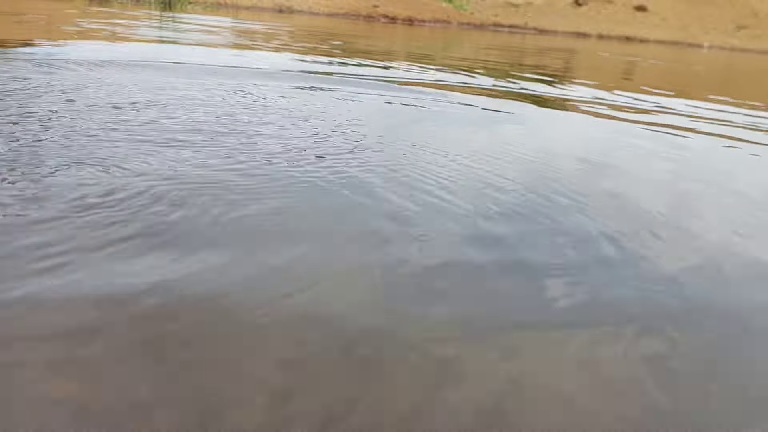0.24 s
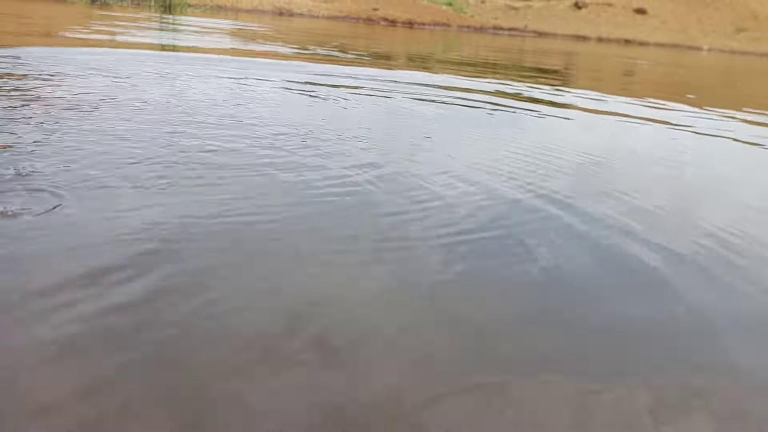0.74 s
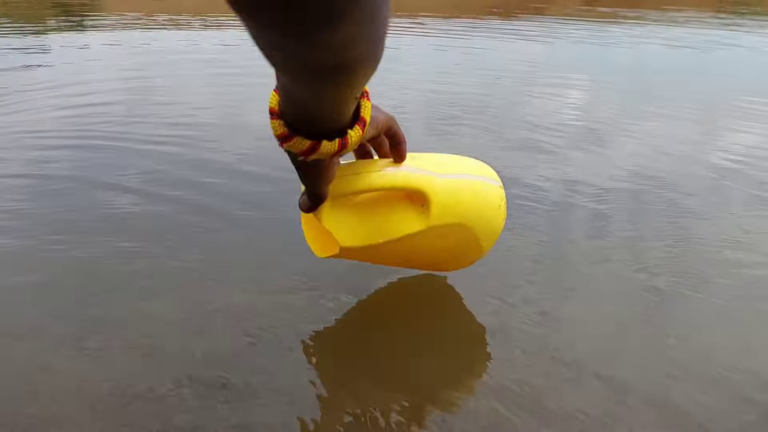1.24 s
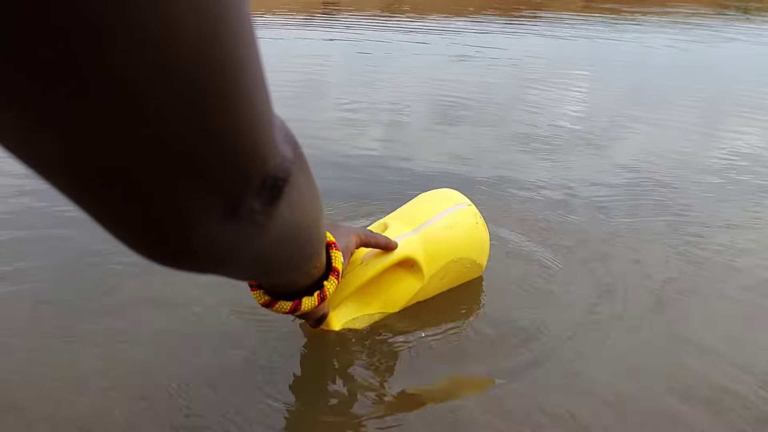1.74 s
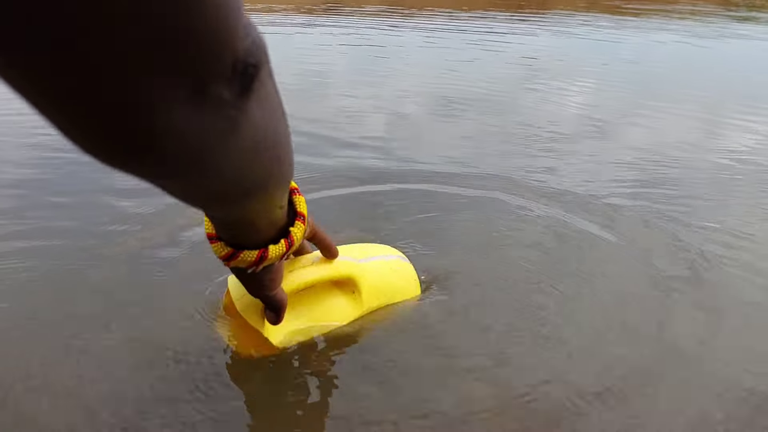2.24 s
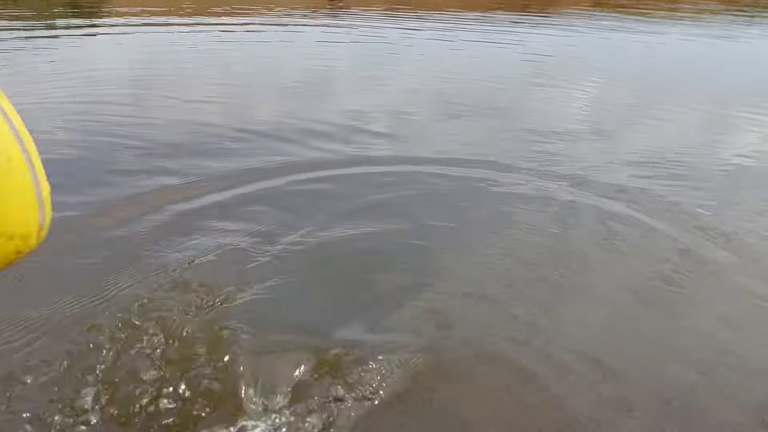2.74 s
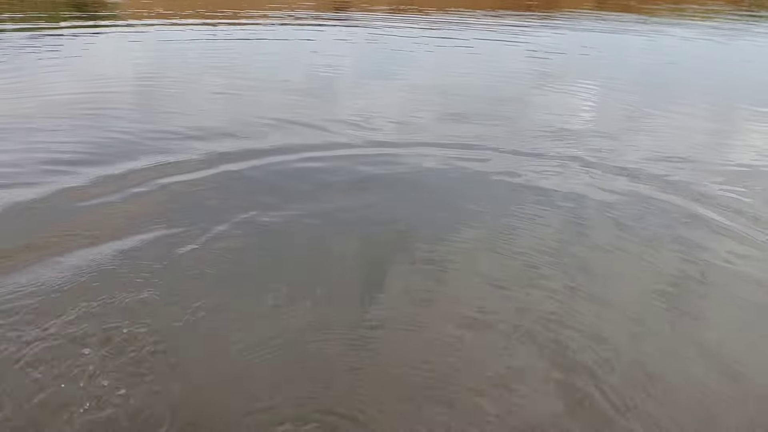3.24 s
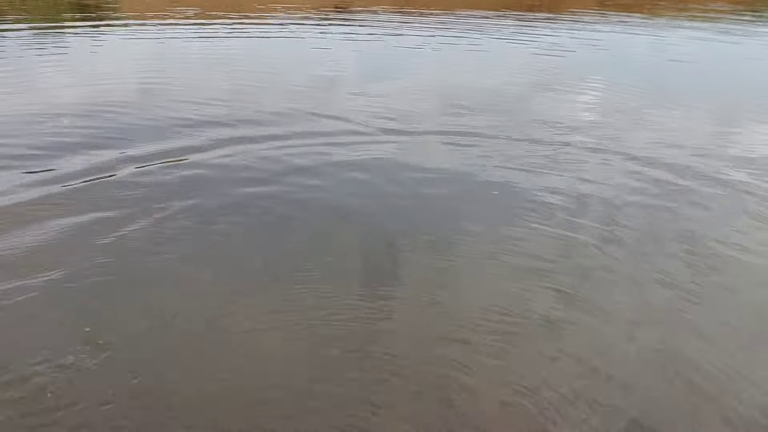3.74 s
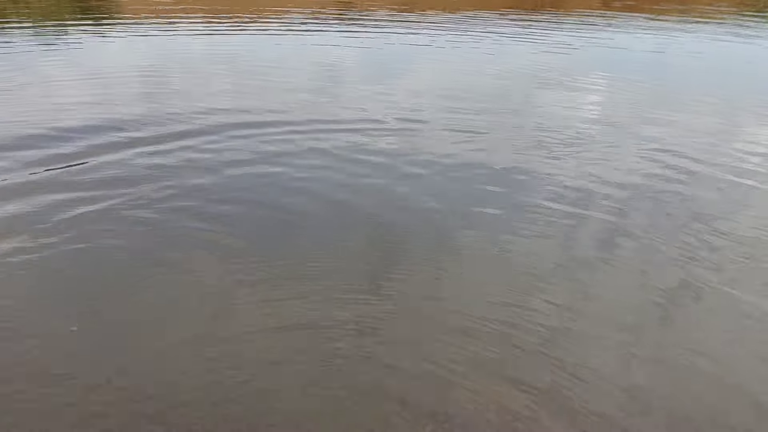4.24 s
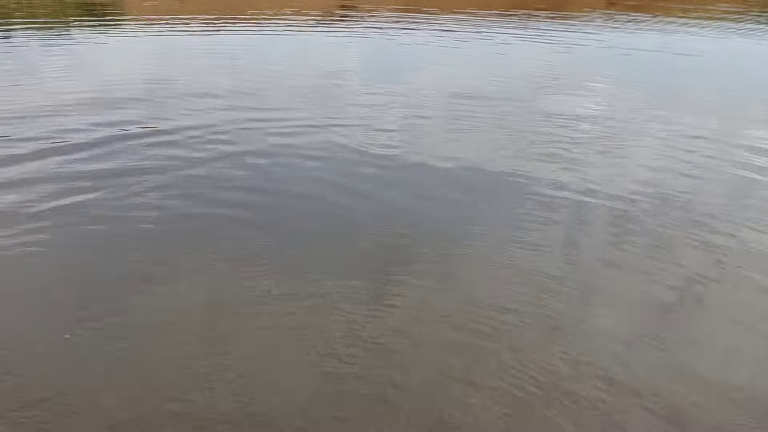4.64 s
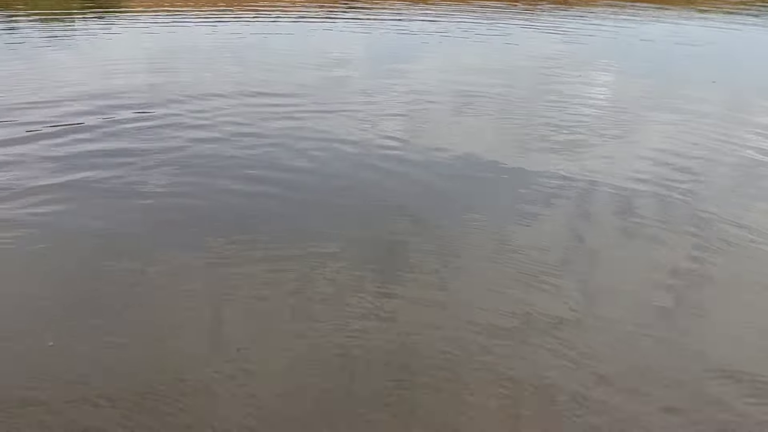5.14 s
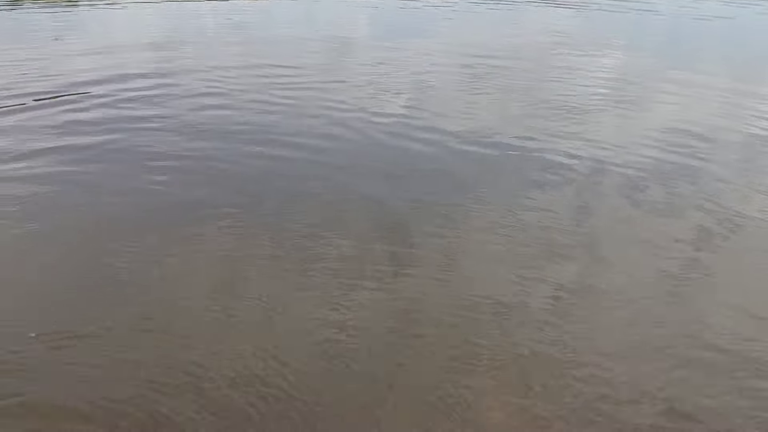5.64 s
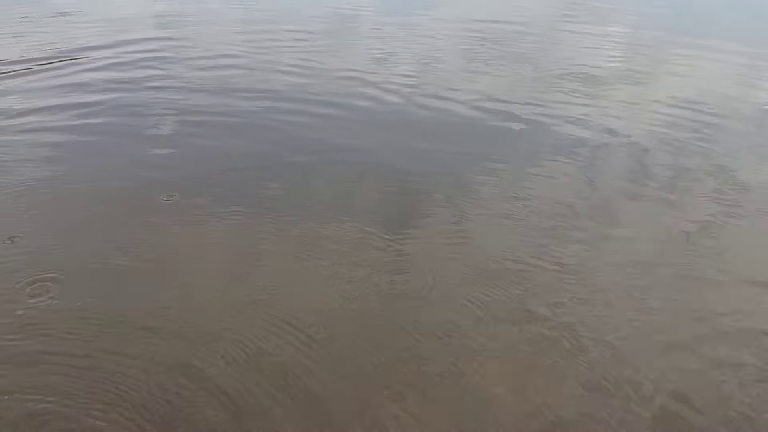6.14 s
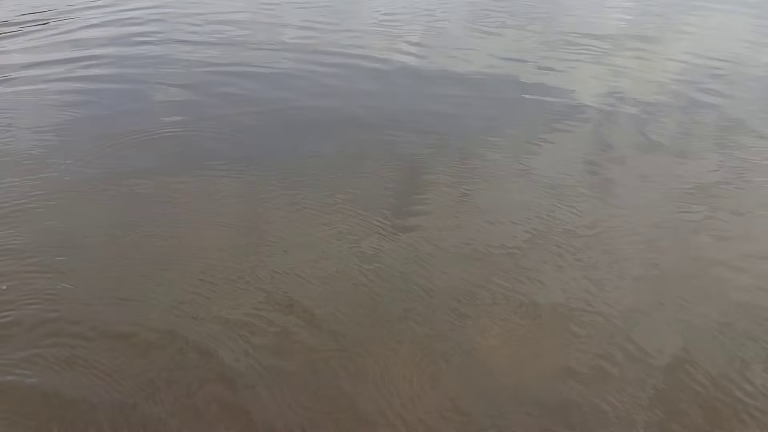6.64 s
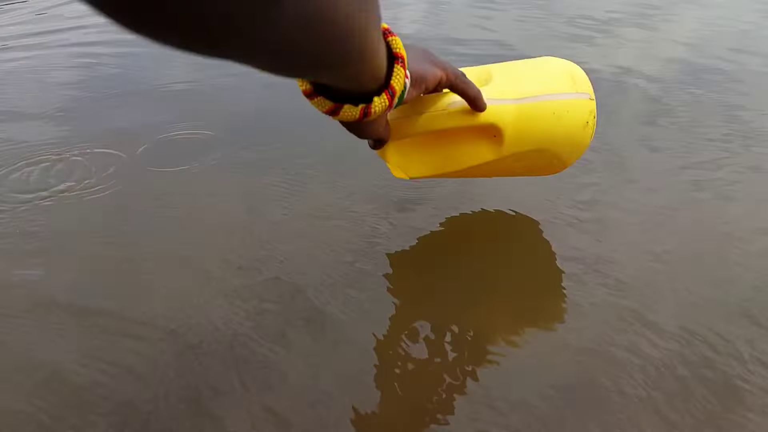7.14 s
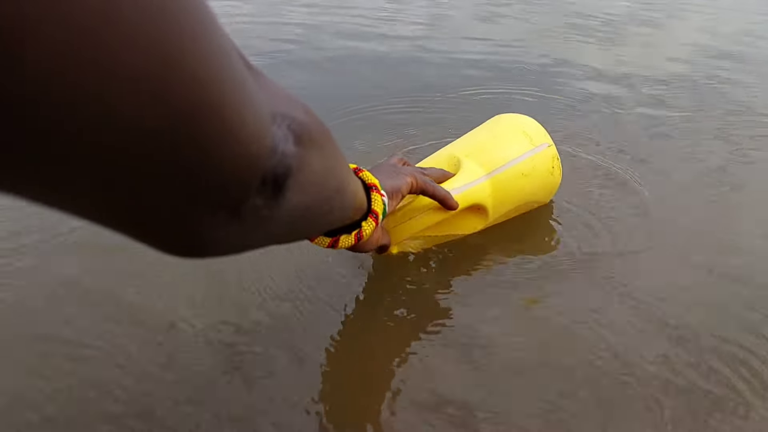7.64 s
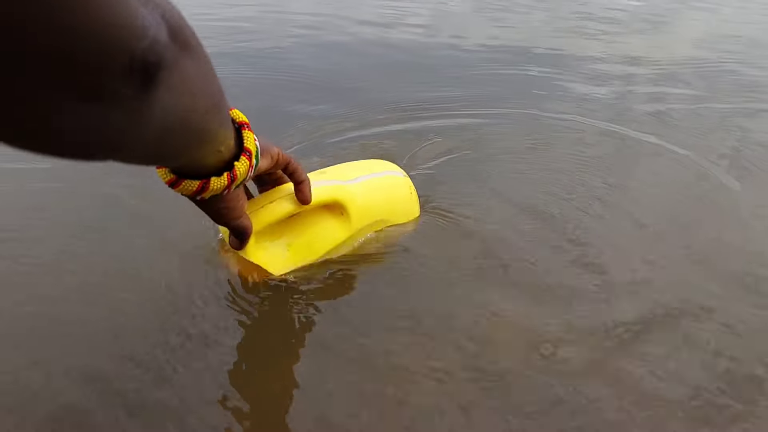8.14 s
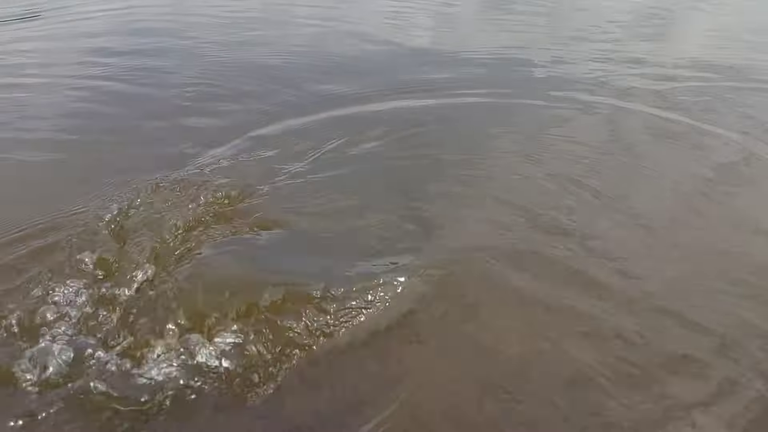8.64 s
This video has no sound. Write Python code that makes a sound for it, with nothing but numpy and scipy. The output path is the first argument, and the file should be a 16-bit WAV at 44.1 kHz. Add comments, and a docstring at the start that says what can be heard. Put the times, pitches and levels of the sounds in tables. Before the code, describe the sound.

Rapid motor chugging and spraying water, abruptly quieter; a plastic jug gulps pond water, empties into a jerrycan, and dips again after wind buffets.

```python
"""A pump engine throbs close by, firing pulses ringing its pipe, with a jet of noise and bubble grains.
After a cut the engine is far off. A plastic jug is dipped, lifted dripping and emptied into a jerrycan
on the left, then dipped again: resonant noise streams, gliding bubble tones and pinging drops.
Wind buffets two microphone ports, mostly the right one, as coloured noise and decaying thumps.
A quiet outdoor hush of noise lies under the far view."""
import sys
import numpy as np
from scipy import signal
from scipy.fft import rfft, irfft, next_fast_len
from scipy.io import wavfile
from scipy.ndimage import uniform_filter1d, map_coordinates

SR = 44100
rng = np.random.default_rng(int(sys.argv[2]) if len(sys.argv) > 2 else 0)


def boost_factor(decibels):
    """Convert a level in decibels to a linear amplitude factor."""
    exponent = np.asarray(decibels, float) / 20
    return 10 ** exponent


def wav_record(signal):
    """Record a signal, one row per channel, as 16-bit PCM in the file named by sys.argv[1]."""
    frames = np.transpose(np.atleast_2d(signal))
    bounded = np.clip(frames, -1, 1)
    # unit amplitude maps onto the largest positive 16-bit level
    quanta = np.round(bounded * 32767).astype(np.int16)
    wavfile.write(sys.argv[1], SR, quanta)


N = 392038

CUT_S = 1.25
PORT_LAG_S = 0.0005277  # travel time between the two ports
TOP_HZ = 16300

# Engine, near and far. Each row: time in seconds, firings per second, level in dB.
ENGINE_NEAR = [(0, 48.7, -32), (.59, 48.4, -29.5), (1.04, 48.0, -29), (1.18, 47.9, -31),
               (1.25, 47.9, -40.5)]
ENGINE_FAR = [(1.25, 42.8, -55), (1.63, 42.7, -52.5), (3.72, 43.5, -55.5), (4.5, 42.86, -54),
              (5.66, 43.54, -58.5), (6.9, 45.1, -54.5), (7.5, 44.45, -48), (7.63, 44.54, -73),
              (8.89, 44.6, -68.5)]
# Exhaust pipe resonances as heard near and far. Each row: centre in Hz, width in Hz, level in dB.
PIPE_NEAR = [(118, 42, 14), (294.6, 62, 11.5), (469, 61, 6), (744, 60, 6.5), (985, 72, 0)]
PIPE_FAR = [(127, 85, 1.5), (237.5, 50, 1), (317.3, 40, -1)]
# Pumped jet. Each row: time in seconds, level in dB.
JET_LEVEL = [(0, -47), (.07, -52), (.3, -47), (.59, -39), (.82, -46), (1.03, -40.5), (1.18, -38),
             (1.25, -48.5)]
# Spectrum of the jet. Each row: frequency in Hz, level in dB per Hz.
JET_COLOUR = [(60, -46), (200, 10.5), (600, 10), (1000, 0), (1650, -0.5), (2250, -8.5), (2850, -1.5),
              (4300, -10.5), (5500, -6), (8500, -18.5), (12000, -16.5), (16000, -26.5)]
JET_FLUTTER_DB = 1.5
# A sharp tap. Each row: time in seconds, level in dB, left over right in dB.
TAPS = [(1.0461, -9.5, 17.5)]

# Stream into the jerrycan. Each row: time in seconds, flow level in dB.
POUR_FLOW = [(3.8, -82), (3.941, -43), (4.08, -50), (4.34, -48.5), (4.55, -53.5), (4.79, -44.5),
             (5.06, -47.5), (5.13, -43.5), (5.45, -47), (5.96, -53), (6.22, -48.5), (6.391, -52),
             (6.56, -77.5)]
POUR_SPRAY_DB, STREAM_FLUTTER_DB = -6, 5
# Air in the jerrycan. Each row: resonance in Hz, width in Hz, level in dB.
CAN_MODES = [(172, 30, 0.5), (390, 110, -3), (740, 100, -2.5), (1273, 18, 3), (1590, 39, 3),
             (1997, 26, 4.5), (2596, 310, -3), (3424, 335, 3), (4970, 490, -2.5), (6750, 590, -7)]
CAN_SAG, SAG_FROM_S, SAG_TO_S = 0.96, 5.2, 5.6  # pitch ratio as the stream shifts
LOW_HZ, LOW_GAIN_DB = 1800, 5  # sunk resonances whose unsunk pitch is under LOW_HZ grow
# Slaps of the stream that ring the jerrycan. Each row: time in seconds, relative strength in dB.
SLAPS = [(4.1343, -34), (4.3398, -38.5), (4.708, -41), (4.8177, -34.5), (4.905, -49), (4.982, -36),
         (5.0948, -34), (5.4306, -33.5), (5.5258, -34.5), (5.5795, -28.5), (5.6322, -40), (5.737, -31.5),
         (6.0251, -30.5), (6.1256, -33.5), (6.375, -29.5), (6.422, -28)]
SLAP_OVER_DB, SLAP_DECAY_S = 45.5, 0.021
# Water stirred in the open: ripples, jug going in, jug lifted out.
# Each row: start in seconds, hold in seconds, slosh level in dB, spray over slosh in dB.
SPLASHES = [(1.29, 0.02, -55.5, -15.5), (1.58, 0.086, -66.5, 1), (2.57, 0.082, -47.5, -1),
            (2.67, 0.043, -48, -4.5), (2.77, 0.033, -39, -6), (2.92, 1, -87, 20), (3.16, 0.011, -62.5, 1.5),
            (3.6, 0.022, -71.5, 10.5), (6.64, 0.0056, -63.5, -6), (6.73, 0.043, -57.5, -7),
            (7.005, 0.028, -59, -11), (7.47, 0.062, -62.5, -3), (8.33, 0.13, -65, -6.5),
            (8.49, 0.097, -49, -8), (8.67, 0.0094, -46.5, -10)]
SPLASH_RISE_DB_PER_S, SPLASH_FALL_DB_PER_S = 178, 125
# Water running into the sunken jug.
# Each row: start in seconds, hold in seconds, slosh level in dB, spray over slosh in dB.
DIPS = [(2.02, 0.019, -56, -5), (2.15, 0.29, -62, -4.5), (7.82, 0.06, -69, -12), (7.92, 0.1, -69.5, 5),
        (8.05, 0.041, -56.5, -26)]
DIP_RISE_DB_PER_S, DIP_FALL_DB_PER_S = 188, 99
JUG_SHARE = 0.69  # share of the dip slosh power that sounds inside the jug
# Air in the jug. Each row: resonance in Hz, width in Hz, level in dB.
JUG_MODES = [(348, 180, 0), (780, 350, -2.5), (1272, 146, 3), (2144, 220, 2), (2800, 250, -1.5),
             (3820, 390, -3)]
CALM_SLOSH_DB, CALM_SPRAY_DB = -83.5, -74
# Spectra of slosh and of fine spray. Each row: frequency in Hz, level in dB per Hz.
SLOSH_COLOUR = [(200, -34), (380, -1.5), (700, -0.5), (1100, -6), (1700, -3.5), (2600, -4), (4000, -14.5),
                (5500, -9), (9000, -97)]
FIZZ_COLOUR = [(1760, -45.5), (3000, -9.5), (3950, -6), (5250, -4.5), (6920, -2), (8560, -11),
               (12500, -1.5), (15500, -13.5), (16300, -37)]

# Large bubbles and hollow plops. Each row: start in seconds, level in dB, pitch in Hz, t60 in seconds.
BUBBLES = [(1.605, -38.5, 1136, 0.019), (1.936, -45, 1214, 0.042), (2.012, -37, 340, 0.074),
           (2.04, -37, 306, 0.2), (2.049, -41, 814, 0.037), (1.89, -52, 1285, 0.054),
           (1.985, -51, 1320, .03), (2.036, -38, 1207, 0.033), (2.315, -49, 626, 0.063),
           (2.388, -51, 780, 0.049), (2.39, -49, 2620, .03), (2.103, -44.5, 390, 0.16),
           (2.271, -38.5, 1800, 0.019), (2.493, -30, 1410, 0.016), (2.519, -40, 458, 0.067),
           (2.571, -28.5, 433, 0.072), (2.563, -31.5, 1057, 0.059), (2.573, -32, 1290, 0.029),
           (2.625, -39.5, 660, 0.11), (2.734, -24, 2180, 0.02), (2.775, -43, 794, 0.058),
           (2.868, -30, 1010, 0.017), (2.79, -21, 430, 0.021), (2.863, -24.5, 603, 0.031),
           (3.029, -28.5, 604, .1), (3.126, -32.5, 620, 0.046), (3.953, -29.5, 165, 0.18),
           (4.344, -33.5, 1590, 0.051), (5.02, -36.5, 418, 0.066), (5.087, -36, 408, 0.054),
           (5.135, -38, 1525, 0.18), (7.005, -38.5, 1410, 0.042), (7.004, -43, 2270, 0.027),
           (7.007, -23.5, 372, 0.081), (7.938, -51.5, 1230, 0.042), (8.037, -47, 1200, 0.079),
           (8.022, -47, 2180, .035), (8.045, -43, 309, 0.16), (8.063, -45, 1250, .03),
           (8.075, -33, 372, 0.061), (8.083, -38, 1780, 0.032), (8.08, -43, 2090, .035),
           (8.082, -30.5, 1290, 0.021), (8.103, -36, 415, 0.087), (8.322, -34, 1500, 0.013),
           (8.336, -48, 1084, 0.063), (8.362, -47, 1610, 0.028), (8.392, -36, 865, 0.028),
           (8.417, -36.5, 1430, 0.025), (8.447, -41, 890, 0.026), (8.488, -36.5, 980, .05),
           (8.566, -48, 2200, .02), (8.58, -48, 627, .06), (8.605, -47, 496, 0.087),
           (8.649, -38, 2520, 0.026), (8.685, -39.5, 377, 0.054), (8.69, -43, 625, 0.089),
           (8.473, -34, 870, 0.037), (8.514, -47.5, 370, 0.44), (8.546, -36.5, 664, 0.062),
           (8.675, -29, 770, 0.027), (8.785, -40.5, 702, 0.075)]
CLIMB_PER_CYCLE = 0.0035  # share of the starting pitch gained per cycle
# Bubbles whose pitch glides as they rise or are swallowed.
# Each row: start in seconds, length in seconds, from Hz, to Hz, level in dB.
WHISTLES = [(1.986, 0.095, 429, 254, -55), (2.57, 0.079, 454, 716, -39.5), (3.027, 0.018, 890, 1620, -33.5),
            (3.143, 0.056, 950, 2150, -54.5), (7.865, 0.13, 437, 257.3, -59),
            (8.388, 0.022, 840, 1460, -44), (8.578, .02, 1100, 1460, -48), (8.65, 0.025, 412, 910, -52.5),
            (8.69, 0.025, 886, 1670, -46)]
# Chance bubbles as the jug fills and comes out. Each row: from seconds, to seconds, bubbles per second.
SWARMS = [(1.97, 2.42, 170), (2.5, 2.88, 420), (7.85, 8.16, 150), (8.33, 8.73, 420)]
# Typical bubble level of each swarm. Each entry: level in dB.
SWARM_DB = [-56.5, -52.5, -76, -60.5]
SWARM_HZ, SWARM_T60_CYCLES = 950, 30
SWARM_CLIMB_PER_CYCLE = 0.016  # these break surface and climb faster
# The clearest drops. Each row: start in seconds, level in dB, pitch in Hz, crack level in dB.
DROPS = [(0.2878, -31, 2550, -1.5), (0.686, -31.5, 2950, 4.5), (0.145, -37, 4670, -9.5),
         (0.237, -37, 8200, -4), (0.812, -31.5, 4430, -17.5), (0.848, -24, 2800, -21),
         (1.3052, -42, 2430, -5.5), (1.488, -39.5, 4460, -10.5), (1.592, -38.5, 2600, -6),
         (1.693, -46.5, 2420, -13), (2.077, -48, 5700, -21), (2.122, -48.5, 3380, -22),
         (2.227, -38, 5000, -33.5), (2.254, -43, 5600, -11.5), (2.36, -45, 5650, -5.5),
         (2.548, -35.5, 3400, -15.5), (2.598, -37, 3900, -15.5), (2.672, -28, 3300, -12),
         (2.648, -28.5, 3440, -26.5), (2.693, -25, 3260, -14), (2.7343, -23.5, 2480, -22),
         (2.7917, -17, 2740, -3), (2.8631, -16, 4570, -8.5), (3.1084, -39.5, 6600, 3),
         (3.4324, -43, 2540, 7.5), (3.526, -29, 4960, -19.5), (3.72, -35, 5240, -0.5),
         (3.738, -41.5, 4500, -6.5), (3.768, -33.5, 5040, -15), (3.8108, -32.5, 6280, -3.5),
         (3.854, -32.5, 5110, 0), (3.9323, -19.5, 4500, -5), (3.954, -28, 2480, 8),
         (4.8198, -24, 3560, -20), (4.9075, -23, 3150, -0.5), (4.9555, -40, 3560, 16.5),
         (5.153, -26.5, 5500, -31), (6.636, -27, 5000, -10.5), (6.78, -36, 3600, -15),
         (7.0064, -34, 3080, -3), (8.0774, -33.5, 4280, -17), (8.8, -45.5, 3800, 1.5),
         (8.6809, -30, 2900, -9.5)]
# Chance drops while water falls. Each row: from seconds, to seconds, drops per second.
SPATTER = [(2.55, 2.86, 20), (4.05, 6.4, 9)]
SPATTER_DB, SPATTER_HZ, SPATTER_CRACK_DB = -46.5, 3150, -22.5

# The wet jug rubs against the hand. Each row: start in seconds, hold in seconds, level in dB.
SCRAPES = [(7.243, 0.03, -54.5), (7.353, 0.051, -54.5)]
SCRAPE_RISE_DB_PER_S, SCRAPE_FALL_DB_PER_S = 2002, 250
# Spectrum of the rubbing. Each row: frequency in Hz, level in dB per Hz.
SCRAPE_COLOUR = [(400, -29), (900, 0.5), (2100, -4), (2800, -12.5), (6000, -11.5), (9000, -18),
                 (16000, -27)]

# Gusts on the ports.
# Each row: start in seconds, hold in seconds, level in dB on the port hit harder, left over right in dB.
GUSTS = [(1.578, 0.036, -47.5, -8), (1.756, 0.12, -46, -19), (2.093, .03, -50, 0), (2.24, 0.02, -48, -13),
         (2.557, 0.052, -37, -16), (2.724, 0.31, -43, -11), (3.45, 0.022, -42.5, -3.5),
         (3.61, 0.14, -52, -16), (4.013, 0.027, -42.5, 11), (4.254, 0.12, -29, -26),
         (4.5, 0.14, -36.5, -24), (4.83, 0.3, -44.5, -3), (5.17, 0.017, -32.5, -19), (5.47, 0.41, -54, 3),
         (6.2, 0.073, -52.5, 3), (6.559, 0.012, -30.5, -22), (6.642, 0.028, -23.5, -27),
         (6.75, 0.057, -29, -17), (6.922, 0.043, -29, -11), (7.005, .02, -38.5, -6),
         (7.178, 0.033, -18, -7.5), (7.327, 0.015, -20.5, -8.5), (7.394, 0.026, -14.5, -31),
         (7.492, 0.019, -17.5, -12), (8.83, 0.04, -49, -3)]
GUST_RISE_DB_PER_S, GUST_FALL_DB_PER_S = 166, 140
# Wind between the gusts. Each row: time in seconds, level in dB.
BREEZE = [(1.25, -70), (3.9, -61), (6.0, -59), (7.5, -45.5), (7.58, -63), (8.89, -67.5)]
WIND_STOP_S, WIND_STOP_DB_PER_S = 7.535, 911  # the wind noise stops abruptly
# Spectra of soft and of hard gusts, the hard ones brighter. Each row: frequency in Hz, level in dB per Hz.
SOFT_GUST_COLOUR = [(15, -27), (50, 1.5), (115, -8.5), (225, -25), (330, -40), (500, -56), (900, -64)]
HARD_GUST_COLOUR = [(15, -15), (50, 13), (200, 5), (300, -5.5), (450, -19), (700, -33.5), (1200, -77),
                    (4000, -88)]
# Short low thumps: a thud as the pour begins, and wind slapping a port.
# Each row: start in seconds, level in dB on the right port, pitch in Hz, left over right in dB.
THUMPS = [(3.951, -34.5, 372, 0.5), (7.176, -16, 221, -17), (7.311, -9.5, 200, -23), (7.371, -16, 150, -25),
          (7.386, -2, 205, -29), (7.405, 2.5, 277, -36), (7.479, -11, 207, -22), (8.798, -35, 54.6, 4)]
THUMP_T60_CYCLES = 7.6
# Spectrum of the far outdoor hush. Each row: frequency in Hz, level in dB per Hz.
HUSH_COLOUR = [(18, -30), (30, -32), (267, -1), (420, -12.5), (621, -18), (5680, -62), (8890, -38),
               (12900, -37), (16300, -35.5)]


def unit(x):
    """Scaled to rms 1."""
    return x / np.sqrt(np.mean(x ** 2) + 1e-20)


def noise():
    """One channel of white noise."""
    return rng.standard_normal(N)


def curves(rows):
    """One value per sample for each column after the time."""
    s, *columns = np.transpose(rows)
    return [np.interp(np.arange(N) / SR, s, column) for column in columns]


def wobble(knots_per_s):
    """A smooth random curve through normal random knots."""
    knots = rng.standard_normal(int(N * knots_per_s / SR) + 4)
    return map_coordinates(knots, [np.arange(N) * knots_per_s / SR])


def filtered(x, response):
    """x times a complex response of frequency."""
    m = next_fast_len(N + 8192)
    return irfft(rfft(x, m) * response(np.fft.rfftfreq(m, 1 / SR)), m)[..., :N]


def coloured(x, points):
    """x through (Hz, dB) points read on a log frequency axis, rms 1."""
    f, db = np.transpose(points)
    return unit(filtered(x, lambda hz: boost_factor(np.interp(np.log(hz + 1), np.log(f + 1), db))))


def resonant(x, modes, alternate=True):
    """x through causal resonances, rms 1; like signs leave deep valleys between them."""
    sign = -1 if alternate else 1

    def response(f):
        total = 0
        for k, (centre, width, db) in enumerate(modes):
            damping = 1j * f * width
            total = total + sign ** k * boost_factor(db) * damping / (centre * centre - f * f + damping)
        return total

    return unit(filtered(x, response))


def ports(x, lead_s, pan_db, echo_db):
    """A source reaches the left port lead_s early; scattered echoes off the banks differ per port."""
    sides = np.array([[1], [-1]])
    direct = filtered(x, lambda hz: boost_factor(sides * pan_db / 2) * np.exp(1j * np.pi * hz * lead_s * sides))
    tail = rng.standard_normal((2, 2400)) * boost_factor(-60 * np.arange(2400) / SR / 0.051)
    tail = tail / np.linalg.norm(tail[0])
    return direct + boost_factor(echo_db) * signal.fftconvolve(x[None], tail, axes=1)[:, :N]


def wide(x, lead_s, own):
    """A spread-out source: a part common to both ports plus a part that only one port catches."""
    separate = np.array([np.roll(x, SR), np.roll(x, -SR)])
    return ports(x, lead_s, 0, echo_db=-20) + own * separate


def add(track, s, wave, lead_s, pan_db):
    """Lays one event on both ports."""
    for side, sign in zip(track, (1, -1)):
        side[round((s - sign * lead_s / 2) * SR):][:len(wave)] += boost_factor(sign * pan_db / 2) * wave


def grains(count, mid_hz, spread, cycles, size_db, size=400):
    """A random crowd of small bubbles: damped sines whose pitch climbs, rms 1."""
    u, t = rng.random((count, 2)), np.arange(size) / SR
    hz = np.clip(mid_hz * np.exp(spread * rng.standard_normal((count, 1))), 300, 16000)
    life = t * hz / cycles
    strength = boost_factor(-size_db * np.log(u[:, 1:] + 12 / count))
    envelope = np.exp(-life) * (1 - np.exp(-4 * life))
    wave = strength * envelope * np.sin(2 * np.pi * hz * t * (1 + 0.048 * life))
    wave = wave * np.hanning(2 * size)[size:]
    at = (u[:, :1] * N).astype(int) + np.arange(size)
    return unit(np.bincount(at.ravel(), wave.ravel(), N + size)[:N])


def swell(s, hold, db, rise_db_per_s, fall_db_per_s):
    """Power of one event that rises, holds and falls at steady rates in dB."""
    t = np.arange(N) / SR
    rise = rise_db_per_s * np.clip(s - t, 0, 1)
    fall = fall_db_per_s * np.clip(t - s - hold, 0, 1)
    return boost_factor(db - rise - fall) ** 2


def patchy(x, depth_db):
    """x under a random gain field that shifts in pitch and time, rms 1."""
    z = signal.stft(x, nperseg=256)[2]
    field = uniform_filter1d(rng.standard_normal(z.shape[-2:]), size=3, axis=0)
    field = uniform_filter1d(field, size=6, axis=1)
    return unit(signal.istft(z * boost_factor(depth_db * unit(field)), nperseg=256)[1][..., :N])


def engine(rows, pipe, first, scatter_db, soft_hz):
    """One soft exhaust puff per firing rings the pipe."""
    rate, db = curves(rows)
    firings = np.flatnonzero(np.diff(np.floor(np.cumsum(rate) / SR + first)))
    pulses = np.zeros(N)
    pulses[firings] = boost_factor(scatter_db * rng.standard_normal(len(firings)))
    puffs = signal.sosfilt(signal.butter(6, soft_hz, fs=SR, output="sos"), pulses)
    return -boost_factor(db) * resonant(puffs, pipe, alternate=False)


def jet():
    """Pumped water: noise and bubble grains under a fluttering level."""
    spray = noise() + 0.58 * grains(7000, mid_hz=2800, spread=0.35, cycles=6, size_db=2.0, size=500)
    spray = patchy(coloured(wide(spray, -PORT_LAG_S, 1.0), JET_COLOUR), depth_db=1.5)
    level = boost_factor(curves(JET_LEVEL)[0] + JET_FLUTTER_DB * wobble(8.6))
    return level * spray * boost_factor([[2.5], [.1]])


def pump():
    """Near view: engine and jet, both reaching the right port first, and a sharp decaying tap."""
    near_engine = engine(ENGINE_NEAR, PIPE_NEAR, first=.36, scatter_db=.9, soft_hz=950)
    out = ports(near_engine, -PORT_LAG_S, -.6, -14) + jet()
    t = np.arange(300) / SR
    u = t / 0.00012  # time over the tap's decay
    tap = (u / 2) ** 2 * np.exp(2 - u) * np.sin(2 * np.pi * 1800 * t)
    for s, db, pan_db in TAPS:
        add(out, s, boost_factor(db) * tap, 0, pan_db)
    return out


def stirred(rows, rise_db_per_s, fall_db_per_s):
    """Slosh power and spray power of a table of events."""
    return sum(swell(s, hold, db, rise_db_per_s, fall_db_per_s) * boost_factor([[0], [spray_db]]) ** 2
               for s, hold, db, spray_db in rows)


def slaps():
    """Sudden gain of the stream at each slap, dying fast."""
    hits = np.zeros(N)
    for s, db in SLAPS:
        hits[round(s * SR)] = boost_factor(db + SLAP_OVER_DB)
    return signal.lfilter([1], [1, -np.exp(-1 / (SLAP_DECAY_S * SR))], hits)


def sagging(x, hz, width):
    """One resonance that cross-fades to a lower pitch."""
    turn = np.interp(np.arange(N) / SR, [SAG_FROM_S, SAG_TO_S], [0, np.pi / 2])
    high = resonant(x, [(hz, width, 0)])
    low = boost_factor(LOW_GAIN_DB * (hz < LOW_HZ)) * resonant(x, [(hz * CAN_SAG, width, 0)])
    return np.cos(turn) * high + np.sin(turn) * low


def poured_stream():
    """Fluttering, slapping stream that wakes the air resonances of the jerrycan."""
    stream = noise() * (boost_factor(STREAM_FLUTTER_DB * wobble(40)) + slaps())
    stream = stream + 1.17 * grains(4000, mid_hz=1990, spread=0.65, cycles=5.6, size_db=3.5)
    stream = wide(stream, PORT_LAG_S, 0.72)
    woken = 0
    # the stream shifts about, so each resonance comes and goes on its own
    for k, (hz, width, db) in enumerate(CAN_MODES):
        gain = (-1) ** k * boost_factor(db + 4.1 * wobble(7)) * width ** 0.39
        woken = woken + gain * sagging(stream, hz, width)
    mixed = unit(woken) + 0.49 * coloured(stream, SLOSH_COLOUR)
    return patchy(mixed, depth_db=3.0) * boost_factor([[2.5], [-1.5]])


def open_slosh(power):
    """Patchy noise of stirred water; only lively water makes bubbles."""
    foam = np.clip((10 * np.log10(power) + 62) / 14, 0, .85)
    lively = 0.99 * patchy(noise(), depth_db=10.0)
    lively = lively + grains(3500, mid_hz=1427, spread=0.59, cycles=12, size_db=4.5, size=1000)
    calm = patchy(noise() * boost_factor(4.2 * wobble(50)), depth_db=8.5)
    churn = foam * unit(lively) + (1 - foam) * calm
    return coloured(wide(churn, 0.00027, 1.0), SLOSH_COLOUR)


def jug_slosh():
    """Noise and bubble grains through the air resonances of the jug, twice over."""
    glugs = noise() * boost_factor(4.3 * wobble(45))
    glugs = glugs + 0.8 * grains(3000, mid_hz=1100, spread=0.7, cycles=9.1, size_db=4.5)
    inside = resonant(resonant(wide(glugs, 0.0001, 0.19), JUG_MODES), JUG_MODES)
    return patchy(inside, depth_db=3.5)


def fine_spatter():
    """Fizz of fast-wavering noise and tiny bubble grains, louder on the left."""
    spatter = noise() * boost_factor(4.15 * wobble(30) + 7.25 * wobble(170))
    spatter = spatter + 1.24 * grains(6000, mid_hz=7400, spread=0.579, cycles=4.3, size_db=4.0, size=200)
    return coloured(wide(spatter, PORT_LAG_S, 1.0), FIZZ_COLOUR) * boost_factor([[3], [-5]])


def water():
    """Slosh in the open, in the jug or in the can, under a fizz of fine spatter."""
    splash, splash_spray = stirred(SPLASHES, SPLASH_RISE_DB_PER_S, SPLASH_FALL_DB_PER_S)
    dip, dip_spray = stirred(DIPS, DIP_RISE_DB_PER_S, DIP_FALL_DB_PER_S)
    flow = boost_factor(np.interp(np.arange(N) / SR, *np.transpose(POUR_FLOW), -120, -120)) ** 2
    jug = JUG_SHARE * dip
    outside = splash + dip - jug + boost_factor(CALM_SLOSH_DB) ** 2
    pour_spray = flow * (1 + 0.195 * slaps()) ** 2 * boost_factor(POUR_SPRAY_DB) ** 2
    fizz = splash_spray + dip_spray + pour_spray + boost_factor(CALM_SPRAY_DB) ** 2
    slosh = np.sqrt(outside) * open_slosh(outside + jug) + np.sqrt(jug) * jug_slosh()
    return slosh + np.sqrt(flow) * poured_stream() + np.sqrt(fizz) * fine_spatter()


def chance_bubbles():
    """Random rows of (start, dB, Hz, t60, climb per cycle) for the swarms."""
    rows = []
    for (start, end, rate), swarm_db in zip(SWARMS, SWARM_DB):
        for size, pitch in rng.standard_normal((round(rate * (end - start)), 2)):
            hz = SWARM_HZ * np.exp(0.55 * pitch)
            s = rng.uniform(start, end)
            rows.append((s, swarm_db + 1.8 * size, hz, SWARM_T60_CYCLES / hz, SWARM_CLIMB_PER_CYCLE))
    return rows


def bubbles():
    """Large bubbles ring and climb in pitch while they die; whistling ones glide between two pitches."""
    out, t = np.zeros(N + SR), np.arange(SR // 4) / SR
    listed = [row + (CLIMB_PER_CYCLE,) for row in BUBBLES]
    for s, db, hz, t60, climb in listed + chance_bubbles():
        ring = np.sin(2 * np.pi * hz * (t + climb * hz * t * t / 2)) * (1 - np.exp(-t / 0.001))
        out[round(s * SR):][:len(t)] += boost_factor(db - 60 * t / max(t60, .01)) * ring
    waver = np.pad(wobble(120), (0, SR))
    for s, length, from_hz, to_hz, db in WHISTLES:
        start = round(s * SR)
        u = np.clip(t / length, 0, 1)
        hz = from_hz + (to_hz - from_hz) * u ** 2.01
        level = boost_factor(db + 5.8 * waver[start:][:len(t)]) * np.sin(np.pi * u ** 1.1)
        out[start:][:len(t)] += level * np.sin(2 * np.pi * np.cumsum(hz) / SR)
    return ports(out[:N], .0001, 1.5, -11)


def chance_drops():
    """Random rows of (start, dB, Hz, crack dB) for the spatter."""
    rows = []
    for start, end, rate in SPATTER:
        for size, pitch, crack in rng.standard_normal((round(rate * (end - start)), 3)):
            hz = SPATTER_HZ * np.exp(.15 * pitch)
            s = rng.uniform(start, end)
            rows.append((s, SPATTER_DB + 3 * size, hz, SPATTER_CRACK_DB + 7 * crack))
    return rows


def drops():
    """A drop gives a short high ping with a crack of noise on top."""
    out, t = np.zeros(N + SR), np.arange(1500) / SR
    high = signal.butter(4, 5000, "high", fs=SR)
    for s, db, hz, crack_db in DROPS + chance_drops():
        crack = signal.lfilter(*high, rng.standard_normal(len(t)))
        crack = crack * boost_factor(crack_db - 60 * t / 0.014) * (1 - np.exp(-t / 0.0025))
        ping = np.sin(2 * np.pi * hz * t * (1 + 8 * t))
        ping = ping * boost_factor(-60 * t / 0.0077 - 5.5) * (1 - np.exp(-t / 0.00012))
        out[round(s * SR):][:len(t)] += boost_factor(db) * (ping + crack)
    near = np.arange(N) < CUT_S * SR
    near_drops = ports(out[:N] * near, -PORT_LAG_S, 16.0, 0.72)
    return near_drops + ports(out[:N] * ~near, PORT_LAG_S, 14.7, -0.17)


def scrapes():
    """Rough rubbing noise that starts at once."""
    power = sum(swell(s, hold, db, SCRAPE_RISE_DB_PER_S, SCRAPE_FALL_DB_PER_S) for s, hold, db in SCRAPES)
    rubbing = rng.standard_normal((2, N)) * boost_factor(3.4 * wobble(90))
    return np.sqrt(power) * coloured(rubbing, SCRAPE_COLOUR)


def gust_power():
    """Wind power on each port; gusts begun before the stop are cut off by it."""
    stop = swell(0, WIND_STOP_S, 0, 0, WIND_STOP_DB_PER_S)
    power = boost_factor(curves(BREEZE)[0]) ** 2
    for s, hold, db, pan_db in GUSTS:
        gust = swell(s, hold, db, GUST_RISE_DB_PER_S, GUST_FALL_DB_PER_S)
        sides = boost_factor([[min(pan_db, 0)], [min(-pan_db, 0)]]) ** 2
        power = power + gust * sides * (stop if s < WIND_STOP_S else 1)
    return power


def thumps(out):
    """Adds short low thumps to both ports: damped sines with a soft onset."""
    t = np.arange(SR // 20) / SR
    for s, db, hz, pan_db in THUMPS:
        level = boost_factor(db + pan_db / 2 - 60 * t * hz / THUMP_T60_CYCLES)
        add(out, s, level * np.sin(2 * np.pi * hz * t) * (1 - np.exp(-4 * t * hz)) ** 2, 0, pan_db)
    return out


def wind():
    """Eddies buffet each port on its own; the harder the gust, the brighter and spikier."""
    out = []
    for port_db in 10 * np.log10(gust_power()):
        hard = np.clip((port_db + 34) / 20, 0, 1)
        lumps = noise() * boost_factor(4.44 * wobble(30) + 4.0 * hard * wobble(130))
        soft_part = (1 - hard) * coloured(lumps, SOFT_GUST_COLOUR)
        hard_part = 1.54 * hard * coloured(lumps, HARD_GUST_COLOUR)
        out.append(boost_factor(port_db) * (soft_part + hard_part))
    return np.array(out)


def hush():
    """Far outdoor hush: steady coloured noise, independent on each port."""
    return boost_factor(-63) * coloured(rng.standard_normal((2, N)), HUSH_COLOUR)


def scene():
    """Two views joined by a cut."""
    far_engine = engine(ENGINE_FAR, PIPE_FAR, first=.4, scatter_db=.8, soft_hz=345)
    far_view = ports(far_engine, -.0001, .1, -9) + water() + scrapes() + thumps(wind()) + hush()
    near = np.arange(N) < CUT_S * SR
    return np.where(near, pump(), far_view) + bubbles() + drops()


def low_pass(x):
    """Removes everything above the highest recorded frequency."""
    return signal.sosfilt(signal.butter(12, 16840, fs=SR, output="sos"), x)


def record(dry):
    """The strongest gusts press softly against the top of the range; the band is then cut at TOP_HZ."""
    pressed = dry / (1 + np.abs(dry / .9) ** 4) ** .25
    mix = filtered(pressed, lambda hz: hz < TOP_HZ)
    return low_pass(mix)


dry = scene()
out = record(dry)
wav_record(out)
```